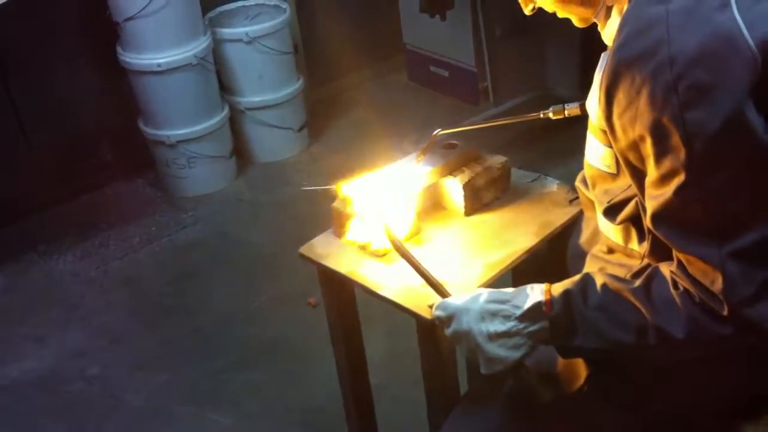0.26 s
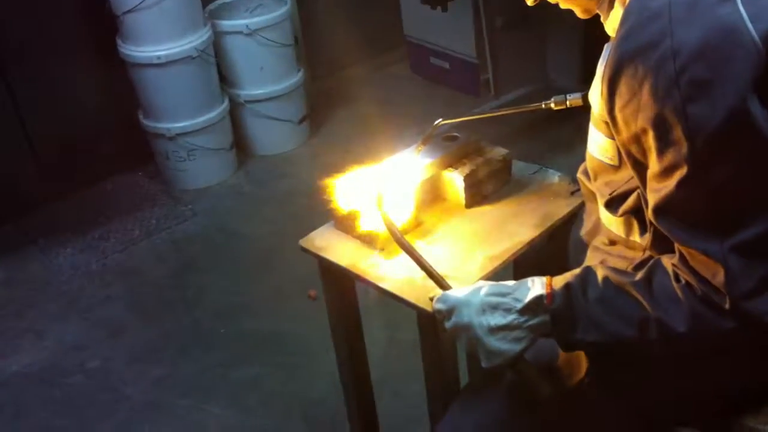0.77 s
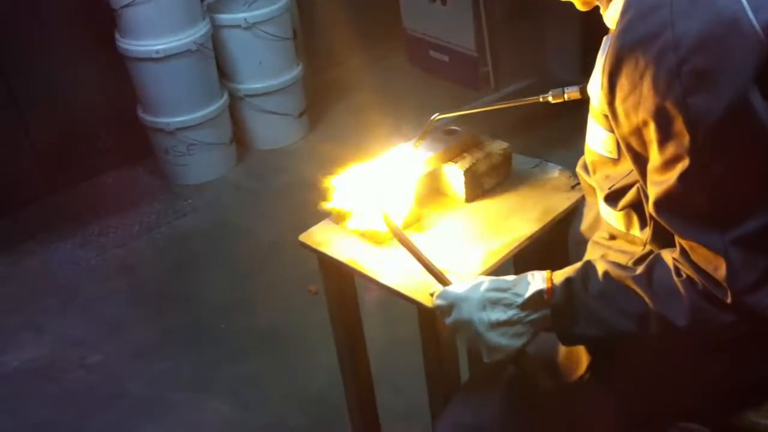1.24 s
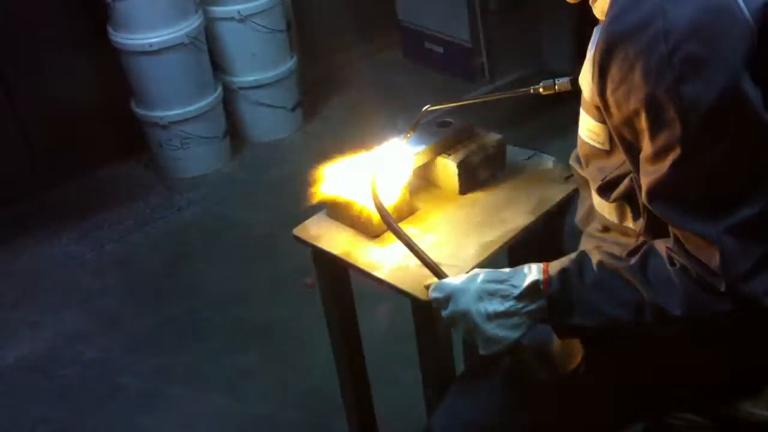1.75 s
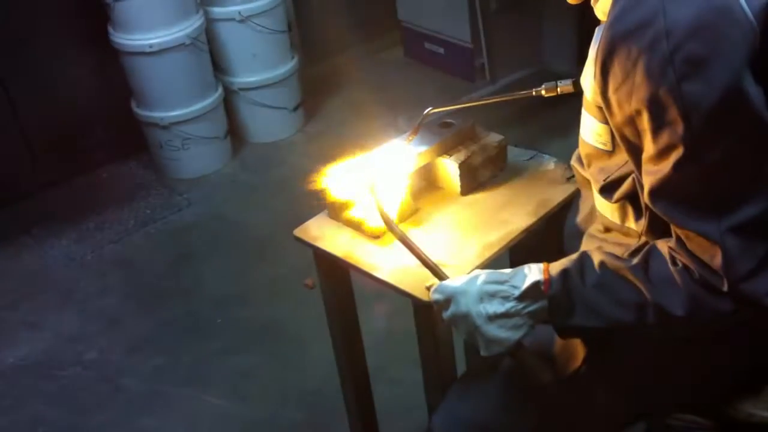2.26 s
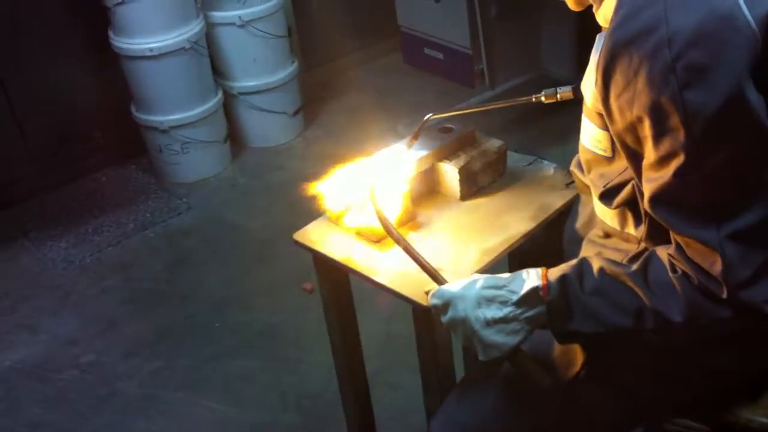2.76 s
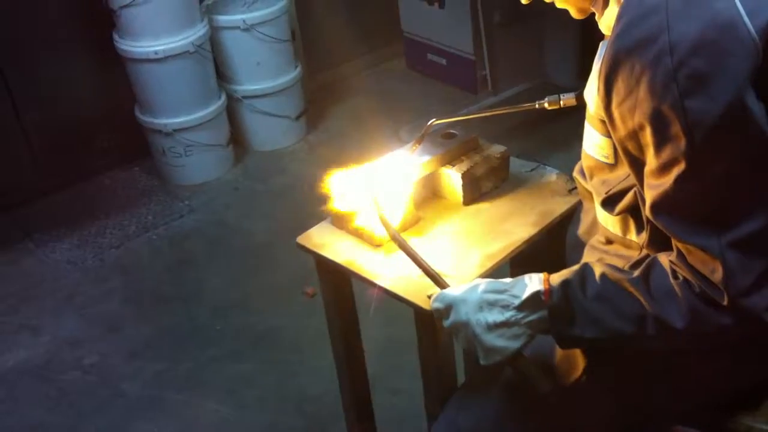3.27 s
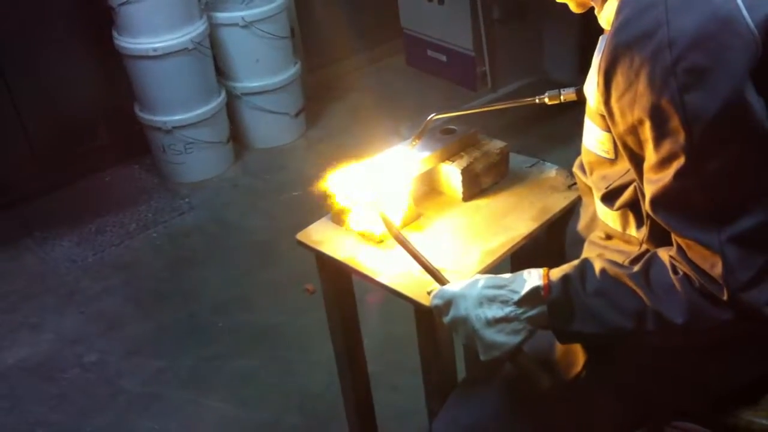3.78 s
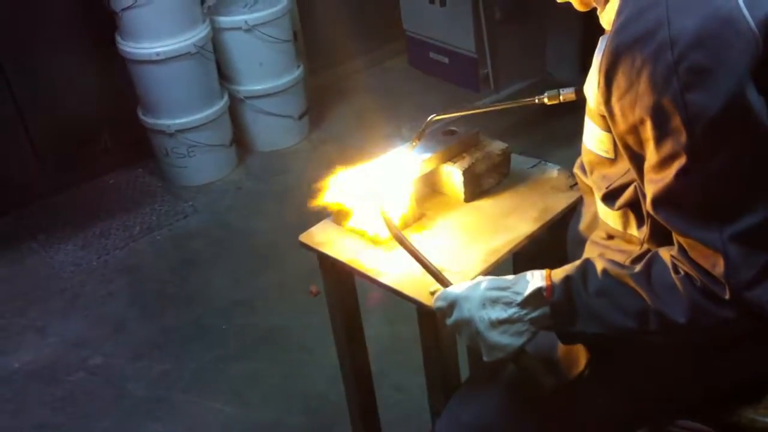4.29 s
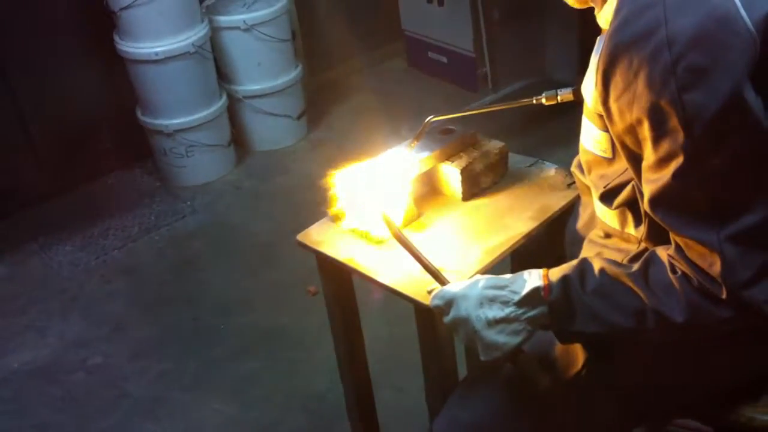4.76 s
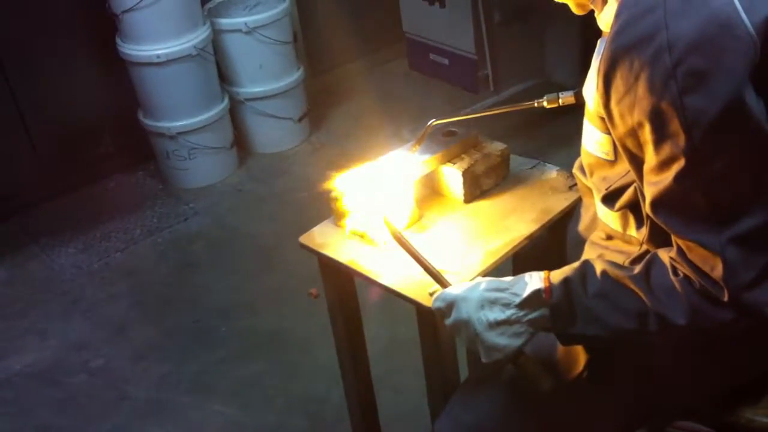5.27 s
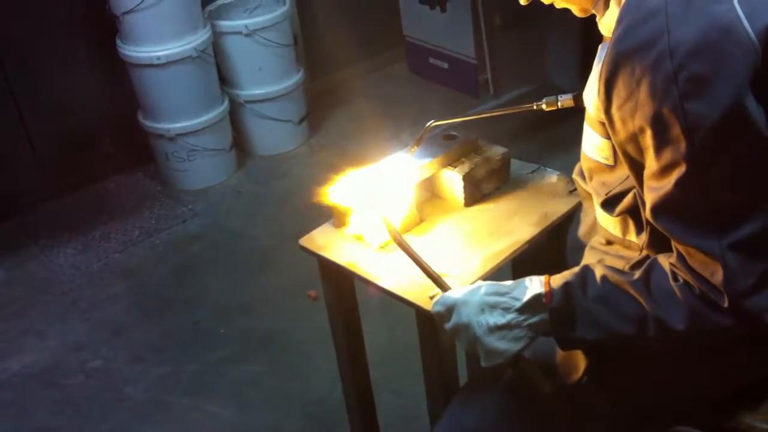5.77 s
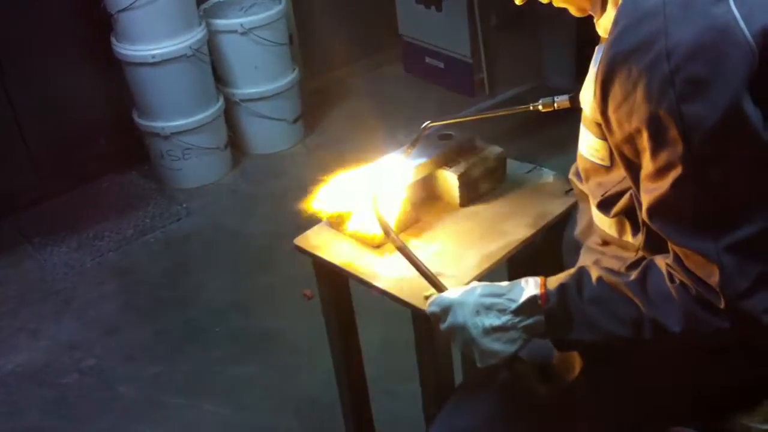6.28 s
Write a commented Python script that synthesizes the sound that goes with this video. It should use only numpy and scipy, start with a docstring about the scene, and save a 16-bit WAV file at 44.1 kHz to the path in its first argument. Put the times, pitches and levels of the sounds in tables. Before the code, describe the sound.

A gas torch hisses steadily over a soft, low roar, sizzling as its flame heats a steel block in a workshop.

```python
"""A gas torch heats a steel block on a welding table, heard by one microphone two metres off.
The jet hisses at the tip, sizzles where it splashes on block and cord, rushes over the table and
roars softly below. Narrow bands in the hiss drift in pitch; the jet flares and falters.
Table, block and floor comb the noise with short echoes; the workshop adds a brief diffuse tail.
Twice the whole level dips and creeps back."""
import sys
import numpy as np
from scipy import signal
from scipy.fft import rfft, irfft, next_fast_len
from scipy.io import wavfile
from scipy.ndimage import uniform_filter1d, map_coordinates

SR = 44100
rng = np.random.default_rng(int(sys.argv[2]) if len(sys.argv) > 2 else 0)


def persist_wave(psi):
    """Save psi, clipped to +-1, as 16-bit WAV."""
    counts = np.round(np.clip(psi, -1, 1) * 32767).astype(np.int16)
    wavfile.write(sys.argv[1], SR, np.atleast_2d(counts).T)


N = 287973
TIME_S = np.arange(N) / SR


def amp(db):
    """Decibels to gain."""
    return 10 ** (np.asarray(db) / 20)


def unit_rms(x):
    """Scale to rms 1."""
    return x / np.sqrt(np.mean(x ** 2) + 1e-20)


def bell(offset, width):
    """Gaussian of peak 1, given its full width at half height."""
    return np.exp(-np.log(2) * (2 * offset / width) ** 2)


def log_interp(points, hz):
    """Interpolate (frequency, value) points on a log frequency axis."""
    knots_hz, values = np.transpose(points)
    return np.interp(np.log(hz + 1), np.log(knots_hz + 1), values)


def wobble(rate_hz):
    """Smooth random curve, rate_hz knots a second."""
    knots = rng.standard_normal(int(N * rate_hz / SR) + 4)
    return map_coordinates(knots, [np.arange(N) * rate_hz / SR])


def filtered(x, response):
    """Apply a complex frequency response."""
    size = next_fast_len(N + SR // 2)
    return irfft(rfft(x, size) * response(np.fft.rfftfreq(size, 1 / SR)), size)[..., :N]


def patches(shape, bins, frames):
    """Random field of rms 1, smooth over bins and frames."""
    field = rng.standard_normal(shape)
    for _ in range(2):
        field = uniform_filter1d(uniform_filter1d(field, bins, axis=0), frames, axis=1)
    return unit_rms(field)


def turbulence(spectrum, eddy_db, streak_db, drift_db):
    """Noise of rms 1: broad eddies come and go, narrow streaks flicker, bands drift."""
    z = signal.stft(rng.standard_normal(N), nperseg=2048, noverlap=1536)[2]
    streak = patches(z.shape, bins=2, frames=9)
    streak -= 0.25 * np.abs(streak)  # dips outdo peaks
    gain_db = eddy_db * patches(z.shape, bins=40, frames=4) + streak_db * streak
    gain_db += drift_db * patches(z.shape, bins=14, frames=30)
    noise = signal.istft(z * amp(gain_db), nperseg=2048, noverlap=1536)[1][:N]
    return unit_rms(filtered(noise, lambda hz: amp(log_interp(spectrum, hz))))


# Jet spectrum: (frequency [Hz], relative density [dB])
JET_SPECTRUM = [(3500, -45), (6000, -11.5), (7000, -6), (8150, 0), (9400, 2), (12600, 0.5), (14000, -0.5),
                (15000, -0.5), (15700, -5)]
# Slow jet level: (time [s], level [dB])
JET_LEVELS = [(0, -17), (.9, -16.5), (1.4, -16), (2.15, -16.5), (2.9, -15.5), (3.6, -17.5), (4.4, -16),
              (5.15, -17), (5.6, -16.5), (6.53, -17)]


def jet(swell_db):
    """The smallest eddies hiss at the tip."""
    level_db = np.interp(TIME_S, *np.transpose(JET_LEVELS)) + swell_db
    return amp(level_db) * turbulence(JET_SPECTRUM, eddy_db=1.1, streak_db=3.0, drift_db=0.38)


# Splash spectrum: (frequency [Hz], relative density [dB])
SPLASH_SPECTRUM = [(2000, -34), (3200, -7.5), (4500, -3.5), (6500, 1), (8000, -6.5), (11000, -30),
                   (15000, -33)]


def splash(level_db):
    """The jet sizzles where it hits block and cord."""
    return amp(level_db) * turbulence(SPLASH_SPECTRUM, eddy_db=1.2, streak_db=4.0, drift_db=-0.4)


# Reflection off the block: (time [s], delay [ms], gain [dB])
BLOCK_ECHO = [(0, 1.3, -22), (1.3, 1.6, -14), (1.55, 1.64, -13), (2.15, 1.16, -15), (2.5, 1.17, -24),
              (4.5, 1.25, -29), (6.53, 1.3, -25)]


def block_echo(x):
    """Add an echo whose delay glides as the torch is moved, so its notches slide."""
    times_s, delays_ms, gains_db = np.transpose(BLOCK_ECHO)
    delay_samples = np.interp(TIME_S, times_s, delays_ms) * SR / 1e3
    echo = map_coordinates(x, [np.arange(N) - delay_samples], mode="nearest")
    return x + amp(np.interp(TIME_S, times_s, gains_db)) * echo


# Rush spectrum: (frequency [Hz], relative density [dB])
RUSH_SPECTRUM = [(250, -38), (550, -5), (950, -1), (1400, -4.5), (2000, -3), (3000, -2.5), (4000, -8.5),
                 (6500, -23.5)]


def rush(level_db):
    """Larger eddies rush over the table."""
    return amp(level_db) * turbulence(RUSH_SPECTRUM, eddy_db=0.82, streak_db=1.7, drift_db=0.33)


# Roar spectrum: (frequency [Hz], relative density [dB])
ROAR_SPECTRUM = [(20, -52), (35, -50), (55, -29), (90, -13.5), (130, -5.5), (260, 4), (450, 3), (650, -8),
                 (1200, -40)]


def roar(level_db):
    """The largest eddies make a soft, low roar."""
    return amp(level_db) * turbulence(ROAR_SPECTRUM, eddy_db=0.5, streak_db=1.2, drift_db=0.77)


# Flares (+) and falters (-): (time [s], change [dB], width [s])
JET_PUFFS = [(0.106, 2.5, 0.12), (0.343, 2.5, 0.054), (0.415, -1.5, 0.048), (0.557, 2, 0.043),
             (0.617, 1, 0.048), (0.71, -0.5, 0.042), (0.854, 4, 0.086), (0.983, -1.5, 0.3),
             (1.267, 3, 0.11), (1.458, -1, 0.047), (1.512, 2.5, 0.03), (1.626, 3.5, 0.025),
             (1.675, 2.5, 0.076), (1.795, -2.5, 0.034), (2.146, 3, 0.049), (2.377, -1.5, 0.027),
             (2.583, -1, 0.039), (2.71, 3, 0.064), (2.823, 0.5, 0.057), (2.906, -4.5, 0.05),
             (3.01, -4.5, 0.089), (3.189, -2, 0.037), (3.266, -1.5, 0.039), (3.436, -1.5, 0.052),
             (3.51, -1, 0.028), (3.75, -3.5, 0.032), (3.874, 2.5, 0.03), (3.922, -3, 0.036),
             (4.122, -2.5, 0.052), (4.162, 1.5, 0.037), (4.405, -2, 0.035), (4.502, 1.0, 0.09),
             (4.634, -2.5, 0.032), (4.685, 0, 0.036), (4.964, 3.5, 0.051), (5.327, -0.5, 0.079),
             (5.727, -2.5, 0.03), (5.84, 3, 0.03), (5.901, -1, 0.046), (6.002, 2.5, 0.025),
             (6.317, 2.5, 0.057), (6.423, 3, 0.037), (6.476, -0.5, 0.031)]


def puffs_db():
    """The jet flares or falters for a moment, each time a bell in dB."""
    return sum(db * bell(TIME_S - at_s, width_s) for at_s, db, width_s in JET_PUFFS)


# Slow levels as the torch is moved: (time [s], splash [dB], rush [dB], roar [dB])
AIM_LEVELS = [(0.0, -29.5, -31, -34), (0.15, -30, -33.5, -34), (0.3, -30, -32.5, -34),
              (0.45, -28.5, -31.0, -34.5), (0.58, -25.5, -31, -32.5), (0.72, -27.5, -32.5, -37.5),
              (0.85, -27, -32.5, -38), (1.0, -29.5, -35, -34), (1.17, -28.0, -32, -37.5),
              (1.35, -30.5, -34, -36.5), (1.5, -29, -31.5, -38), (1.62, -31.5, -32.5, -32.5),
              (1.78, -28.5, -32.5, -35.5), (1.95, -29.5, -32, -33), (2.1, -24, -32.5, -34),
              (2.22, -26, -33.5, -39), (2.4, -25.5, -31, -34.5), (2.55, -26.5, -31, -35),
              (2.7, -28.5, -32.5, -37), (2.88, -31, -35, -39), (3.05, -28, -33.5, -36.5),
              (3.27, -29, -31.5, -35.5), (3.31, -27.5, -32, -34.5), (3.41, -26, -30, -34.5),
              (3.47, -27, -30, -34), (3.57, -23, -31, -35.5), (3.72, -28.5, -32.5, -35.5),
              (3.88, -25, -31, -34.5), (4.0, -26.5, -32.5, -35), (4.15, -24.5, -30.5, -36.5),
              (4.35, -25.0, -30.5, -35.5), (4.5, -24.5, -30, -36), (4.62, -27, -30, -33.5),
              (4.72, -29.5, -31, -32.5), (4.8, -27, -30, -34), (4.92, -26.5, -31, -30.5),
              (4.97, -28, -33.5, -37.5), (5.05, -25.5, -32, -32), (5.25, -25, -30.5, -38),
              (5.45, -24.5, -30.5, -36.5), (5.6, -27.5, -32, -35.5), (5.75, -26, -32.5, -36.5),
              (5.9, -30.5, -33, -35), (6.1, -22.5, -32.5, -38.5), (6.25, -27, -32.5, -38),
              (6.4, -27.5, -35, -39), (6.53, -28.5, -32.5, -37)]


def torch():
    """Four zones of one flame follow set level curves, with a slight waver and a shared flutter."""
    times_s, *levels_db = np.transpose(AIM_LEVELS)
    splash_db, rush_db, roar_db = (np.interp(TIME_S, times_s, db) for db in levels_db)
    puff_db = puffs_db()
    jet_swell_db = 0.25 * (splash_db - splash_db.mean()) + puff_db + 0.25 * wobble(11)
    splash_db += 0.34 * puff_db + 0.35 * wobble(11)
    rush_db += 0.3 * wobble(11)
    roar_db += 0.3 * wobble(11)
    flutter_db = 0.12 * wobble(24) + 0.4 * wobble(180)
    return (jet(jet_swell_db + flutter_db)
            + block_echo(splash(splash_db + 0.53 * flutter_db))
            + rush(rush_db + 0.46 * flutter_db)
            + roar(roar_db + 0.27 * flutter_db))


# Bands of the hiss: (width [Hz], path of (time [s], centre [Hz], gain [dB]))
HISS_BANDS = [(600, [(0, 12350, 3), (1.2, 12450, 2), (1.45, 12300, 0), (2.9, 12200, 2), (3.5, 12550, 2.5),
              (3.75, 12250, 2), (4.8, 11900, 2.5), (5.15, 12200, -1), (5.25, 12850, 2), (6.1, 12250, 3),
              (6.53, 12200, 3.5)]), (350, [(0, 9500, 2), (.25, 9650, 5), (1.3, 9650, -0.5),
              (2.2, 9540, 5.5), (2.45, 9450, 2), (3.9, 9500, 0.5), (4.4, 9550, -3.5), (5.65, 9600, 4.5),
              (6.53, 9500, 2)]), (250, [(0, 8800, -1), (1.5, 8950, -5), (3.6, 8920, 3), (4.45, 9000, 4),
              (5.1, 9130, 2), (5.7, 8850, -1.5), (6.53, 8880, 5)]), (220, [(0, 8200, -3), (1.5, 8020, -3),
              (1.9, 8050, 1), (2.3, 8030, -1), (3.5, 7950, -2), (4.25, 7930, -5), (4.8, 7950, -2),
              (5.6, 8020, -7), (6.53, 7950, -3)]), (420, [(0, 7800, 2), (.85, 7650, 3.5), (1.5, 7630, 3),
              (1.95, 7650, -3), (2.3, 7650, 5), (2.75, 7440, 3.5), (3.3, 7500, 1.5), (3.85, 7500, 2.5),
              (6.53, 7600, 4)]), (300, [(0, 6950, -3), (.35, 7200, -1.5), (.55, 7050, -1), (1.2, 6950, -9),
              (1.4, 7100, 3), (2.05, 7250, -1), (2.27, 7000, -2), (2.8, 6950, -2), (3.9, 7200, 0),
              (5, 6800, -2), (6.53, 7050, -2)]), (250, [(0, 5600, -3), (.5, 5650, -2.5), (.9, 6100, -3),
              (1.55, 6240, -1), (2, 6000, -2), (2.8, 5680, 0), (3.7, 6400, -10), (4.1, 6300, 1.5),
              (5.8, 5650, -1.5), (6.53, 5350, 0)]), (250, [(0, 4900, 3), (.7, 5000, -5), (1.6, 4800, 3),
              (2, 4870, 6), (2.25, 4750, -5), (2.8, 4700, 0.5), (4.4, 4700, -0.5), (5.6, 4680, -1.5),
              (6.53, 4800, -1)]), (330, [(0, 3770, -5), (1.3, 3650, -3), (1.7, 3400, -4.5), (3.3, 3400, -4),
              (3.85, 3480, -1), (4.4, 3480, -3.5), (5.85, 3520, -2.5), (6.3, 3520, -4.5),
              (6.53, 3480, -4.5)])]


def sliding_bands(x):
    """Narrow bright and dark bands in the hiss drift in pitch, swell and fade."""
    hz, frame_s, z = signal.stft(x, SR, nperseg=1024)
    gain_db = 0
    for width_hz, path in HISS_BANDS:
        times_s, centres_hz, peaks_db = np.transpose(path)
        offset_hz = hz[:, None] - np.interp(frame_s, times_s, centres_hz)
        gain_db += np.interp(frame_s, times_s, peaks_db) * bell(offset_hz, width_hz)
    return signal.istft(z * amp(gain_db), SR, nperseg=1024)[1][:N]


# Echoes off nearby hard surfaces: (delay [ms], gain [dB], cutoff [Hz])
SURFACE_ECHOES = [(.65, -26, 11900), (1.049, -14.5, 4000), (1.301, -33.5, 12000), (1.53, -31.5, 12000),
                  (6.8, -17, 9100)]


def surface_comb(hz):
    """Direct sound plus delayed, duller copies: a response with regular peaks and notches."""
    return 1 + sum(amp(db) * np.exp(-2j * np.pi * hz * delay_ms / 1e3) / (1 + (hz / cutoff_hz) ** 2)
                   for delay_ms, db, cutoff_hz in SURFACE_ECHOES)


# Workshop decay: (frequency [Hz], T60 [s])
WORKSHOP_T60 = [(200, 0.29), (2000, 0.84), (10000, 0.17)]


def workshop_tail(x):
    """Diffuse reverberation; each frequency dies at its own rate."""
    hz, frame_s, z = signal.stft(rng.standard_normal(SR // 2), SR, nperseg=256)
    decay_db = -60 * frame_s / log_interp(WORKSHOP_T60, hz)[:, None]
    tail = signal.istft(z * amp(decay_db), SR, nperseg=256)[1]
    delayed = np.pad(x, (400, 0))  # 9 ms
    return signal.fftconvolve(delayed, tail / np.linalg.norm(tail))[:N]


# Dips of the whole sound: (time [s], depth [dB])
LEVEL_DIPS = [(4.53, 4), (4.981, 4.5)]


def dips_db(drop_s=0.0058, recover_s=0.27):
    """The level falls quickly and creeps back."""
    gain_db = 0
    for start_s, depth_db in LEVEL_DIPS:
        age_s = np.maximum(TIME_S - start_s, 0)
        gain_db -= depth_db * (1 - np.exp(-age_s / drop_s)) * np.exp(-(age_s / recover_s) ** 2)
    return gain_db


def scene():
    """Torch, echoes and workshop; one microphone feeds both channels."""
    near = filtered(sliding_bands(torch()), surface_comb)
    far = amp(-23) * workshop_tail(near)
    heard = amp(dips_db()) * (near + far)
    return np.array([heard, heard])


# Standing colour of table, workshop and microphone port: (centre [Hz], width [Hz], gain [dB])
STANDING_COLOUR = [(122, 11, 5.5), (151.4, 11, 5.5), (245, 21, 4), (294, 43, 1), (418, 32, -3),
                   (501, 27, 5), (571, 31, -9), (683, 22, -2.5), (721, 45, 2.5), (820, 40, -1.5),
                   (963, 69, 5), (1413, 160, -2.5), (1557, 45, 7.5), (1713, 74, 4.5), (1990, 46, -3),
                   (2165, 43, 4), (2545, 110, -7), (3100, 120, 3), (4220, 360, 2), (5090, 300, 2.5),
                   (6650, 200, 0.5), (10350, 450, 2), (11020, 310, -0.5), (13450, 350, 1), (15200, 400, 2),
                   (12300, 1900, 1)]


def record(dry, ceiling=0.92, top_hz=15760):
    """The input stage rounds off the tallest peaks; the sound is then coloured and band-limited."""
    def colour(hz):
        gain_db = sum(db / (1 + (2 * (hz - centre_hz) / width_hz) ** 2)
                      for centre_hz, width_hz, db in STANDING_COLOUR)
        return amp(gain_db) * (hz < top_hz)

    rounded = dry / (1 + (dry / ceiling) ** 4) ** (1 / 4)
    return filtered(rounded, colour)


dry = scene()
out = record(dry)
persist_wave(out)
```